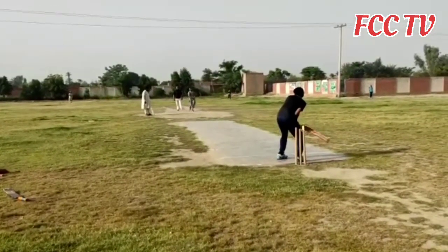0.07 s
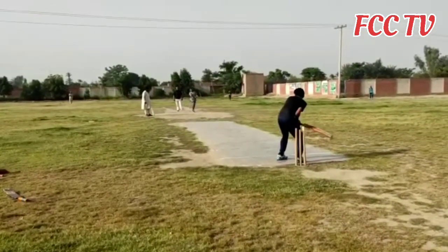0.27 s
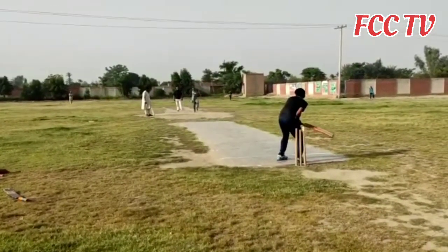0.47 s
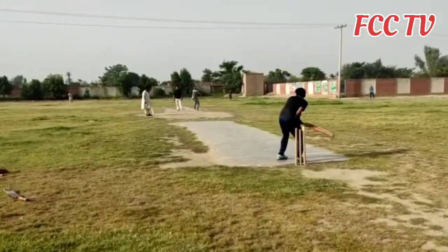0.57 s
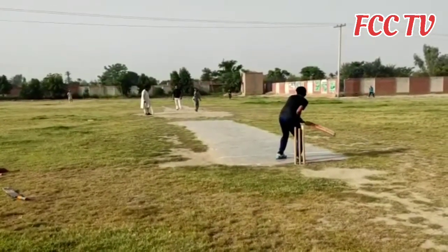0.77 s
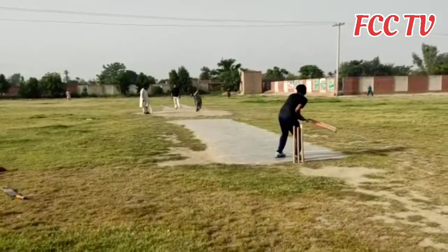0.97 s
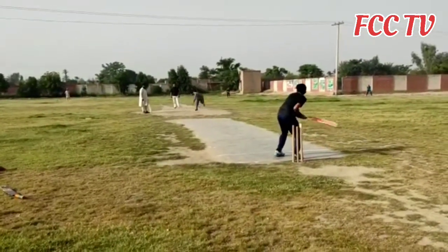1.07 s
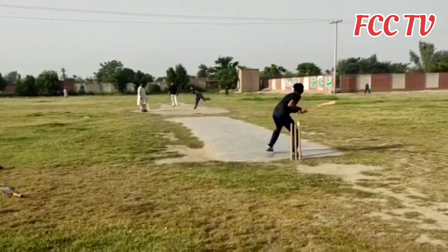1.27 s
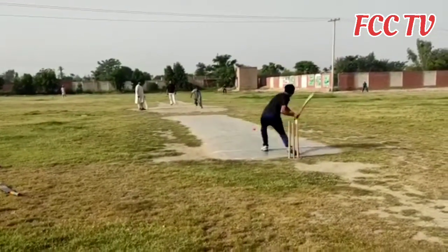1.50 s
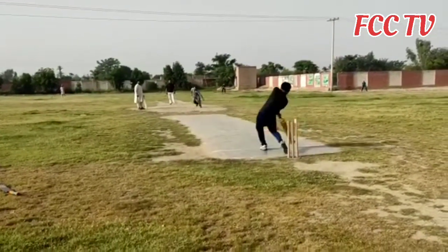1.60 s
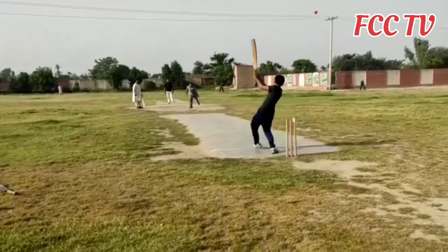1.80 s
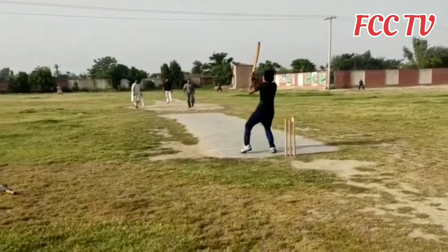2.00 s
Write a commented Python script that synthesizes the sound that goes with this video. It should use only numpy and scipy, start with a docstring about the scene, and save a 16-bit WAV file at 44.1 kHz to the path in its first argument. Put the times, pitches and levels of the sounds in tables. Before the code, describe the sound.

A hard, bright wooden crack of a cricket bat on a ball at 1.72 seconds dominates, slightly clipped. Before it, faint birds chirp until about 1.5 over outdoor hush, light wind and rustle; soft gritty footfalls come near 0.1, 1.0 and 1.54, the ball bounces at 1.63, and the bat faintly swishes. A woody wall echo answers from the left at 1.88, then a step and scrape around 1.94 and a tiny hiss.

```python
"""A bat cracks against a ball on an open cricket ground, after footfalls, a bounce and a swish. A wall far to
the left returns a woody clack 160 ms later; one grainy shoe scrape follows, and a brief grainy swell of noise
closes the scene. Small birds chirp in the distance over a hush, light wind and a soft rustle. Impacts are
coloured noise bursts with decaying sines; birds are gliding sines; the air is steady coloured noise with slowly
wandering levels."""
import sys
import numpy as np
from scipy import signal
from scipy.fft import rfft, irfft
from scipy.io import wavfile
from scipy.ndimage import uniform_filter1d

SR = 44100
rng = np.random.default_rng(int(sys.argv[2]) if len(sys.argv) > 2 else 0)


def inscribe(sig):
    """Save sig as 16-bit PCM at rate SR to the path in sys.argv[1].

    A 1-D sig is mono; a 2-D sig holds one channel per row.
    Samples are clipped to [-1, 1] before scaling.
    """
    pcm = np.round(np.clip(np.atleast_2d(sig).T, -1, 1) * 32767)
    wavfile.write(sys.argv[1], SR, pcm.astype(np.int16))


N = 90404
T = np.arange(N) / SR  # time axis, s
HIT_S = 1.7239  # contact of bat and ball
# spectrum of the crack, shared by bat and wall: freq_hz, level_db
CRACK_SPECTRUM = [(60, -35), (200, -15.5), (390, -24.5), (800, -5), (1180, -14.5), (1550, -4),
                  (2100, -16.5), (2700, -12), (3650, -4), (4900, -15), (5800, -10), (7500, -9),
                  (9500, -22.5), (13600, -34.5), (16000, -44)]


def bat():
    """Impact excitation: a hard broadband crack, a bright snap, a reflection off the pitch, and modal ringing."""
    # dull reflection of the crack off the pitch: freq_hz, level_db
    pitch_spectrum = [(250, -1), (2500, -7), (5000, -14)]
    crack_db, crack_rise_s, crack_decay_s = 22, 0.0009826, 0.00094
    snap_hz, snap_db, snap_peak_s = 3664, -11.5, 0.00046
    pitch_delay_s, pitch_db = 0.0032, -7
    ring_delay_s, ring_rise_s, grip_s = 0.001599, 0.003, 0.009

    crack = amp(crack_db) * colour(burst(crack_rise_s, crack_decay_s), CRACK_SPECTRUM)
    t = T[:SR // 10]
    snap_shape = (t / snap_peak_s) ** 2 * np.exp(2 - 2 * t / snap_peak_s)
    snap = snap_shape * np.sin(2 * np.pi * snap_hz * t)
    add(crack, crack_rise_s, amp(snap_db) * snap)

    out = np.zeros((2, N))
    add(out, HIT_S, crack)
    add(out, HIT_S + pitch_delay_s, amp(pitch_db) * colour(crack, pitch_spectrum))
    add(out, HIT_S + ring_delay_s, ring(ring_rise_s, grip_s))
    return out


def ring(rise_s, grip_s):
    """Modal superposition: blade and ball modes ring with random phases until the grip damps them."""
    # modes of bat and ball, t60 before grip damping: freq_hz, level_db, t60_s, left_over_right_db
    bat_modes = [(229, -24, 0.039, 0), (683, -33, 0.028, 3), (1036, -24.5, 0.029, 2), (1525, -22, 0.02, -7),
                 (2040, -25, 0.03, 5), (2413, -21.5, 0.017, 8), (2552, -11.5, 0.023, 7.5),
                 (3126, -15, 0.024, 3), (3546, -14, 0.02, 7), (6000, -26, 0.012, 0), (6990, -21, 0.0071, 1),
                 (8250, -18, .008, 0)]
    right_lead_s = 0.00002
    t = T[:SR // 10]
    swell = np.minimum(t / rise_s, 1) * np.exp(-(t / grip_s) ** 2)
    ear_t = np.array([t, t + right_lead_s])
    modes = np.zeros((2, len(t)))
    for hz, db, t60, pan_db in bat_modes:
        decay = np.exp(-np.log(1000) * ear_t / t60)
        swing = np.sin(2 * np.pi * (hz * ear_t + rng.random()))
        modes += pan(pan_db) * amp(db) * decay * swing
    return swell * modes


def wall():
    """Delayed specular reflection: the far wall returns a blurred crack and a quick woody ring."""
    # reflectivity of the wall: freq_hz, level_db
    wall_spectrum = [(200, -10), (700, -12), (1000, 1), (1380, 8), (1650, 0), (2080, 12), (2600, 2),
                     (3600, -7.5), (12000, -8)]
    delay_s, pan_db, crack_db, ring_db = 0.1609, 9, 1, -20.5
    rise_s, crack_decay_s, grip_s = 0.00128, 0.002, 0.0075
    out = np.zeros((2, N))
    crack = colour(burst(2 * rise_s, crack_decay_s), CRACK_SPECTRUM)
    add(out, HIT_S + delay_s, amp(crack_db) * crack)
    add(out, HIT_S + delay_s, amp(ring_db) * ring(rise_s, grip_s))
    return pan(pan_db) * colour(out, wall_spectrum)


def bounce():
    """Elastic impact: the ball slaps the hard pitch and gives a hollow, damped thump as it springs back."""
    # gritty slap of ball on pitch: freq_hz, level_db
    slap_spectrum = [(200, -13), (650, -4.5), (1300, -8.5), (2400, -3.5), (3500, -7.5), (4500, 0.5),
                     (5300, -9.5), (7300, 0.5), (9500, -11.5), (15000, -21.5)]
    bounce_s, slap_db, slap_decay_s = 1.6333, -4.5, 0.00185
    out = np.zeros((2, N))
    add(out, bounce_s, amp(slap_db) * colour(burst(0.00038, slap_decay_s), slap_spectrum))
    add(out, bounce_s, -thump(db=-24, hz=287, t60=0.017))
    return out


def feet():
    """Compound impact: each footfall sums a damped thud, a knock of the sole and a crunch of grit."""
    # footfalls: start_s, thud_db, thud_hz, knock_db, grit_db, knock_decay_s
    footfalls = [(.080, -50, 200, -17.5, -18, 0.004), (.978, -41, 203, -20, -27, 0.0012),
                 (0.9946, -37, 304, -12, -24.5, 0.0018), (1.106, -54, 200, -20, -26, .008),
                 (1.534, -40, 200, -13, -13.5, 0.0031), (1.5427, -19, 271, 0, -15, 0.0023),
                 (1.555, -37, 260, -17, -26.5, 0.0052), (1.582, -39, 230, -16.5, -29, 0.0023),
                 (1.82, -47, 240, -16.5, -18.5, 0.0032), (1.9431, -31.5, 169, -3.5, -20, 0.0029)]
    # sole knock, then grit crunch: freq_hz, level_db
    knock_spectrum = [(80, -8.5), (330, -4), (550, -15.5), (720, -2.5), (950, 1.5), (1300, -12),
                      (2500, -42)]
    grit_spectrum = [(200, 3.5), (900, -6), (1700, 1), (4300, -2.5), (5500, -11.5), (7500, -11),
                     (14000, -32)]
    out = np.zeros((2, N))
    for s, thud_db, thud_hz, knock_db, grit_db, decay in footfalls:
        add(out, s, thump(thud_db, thud_hz, t60=0.016))
        add(out, s, amp(knock_db) * colour(burst(0.0011, decay), knock_spectrum))
        # the crunch of grit outlasts the knock
        add(out, s, amp(grit_db) * colour(burst(0.00052, 1.87 * decay), grit_spectrum))
    return out


def thump(db, hz, t60):
    """Damped oscillation: a low push of the ground that dies exponentially."""
    t = T[:SR // 10]
    onset = np.minimum(t * hz * 2, 1)  # rises over half a cycle
    decay = np.exp(-np.log(1000) * t / t60)
    return amp(db) * onset * decay * np.sin(2 * np.pi * hz * t)


def swish():
    """Aerodynamic noise: the moving bat makes a rush of air just before contact."""
    # rush of air: freq_hz, level_db
    swish_spectrum = [(60, -14), (220, 5.5), (500, -11.5), (1200, -11.5), (2500, -8.5), (5000, -14.5),
                      (8000, -22.5), (14000, -33)]
    # one swell of noise: centre_s, half_length_s, level_db
    swish_swell = (1.702, .024, -35)
    return sweep(*swish_swell, swish_spectrum)


def grainy_noises():
    """Roughly modulated noise: one grainy shoe scrape, then a brief grainy swell at the end."""
    # a shoe scrape, then a brief swell: centre_s, half_length_s, level_db
    grainy_swells = [(1.934, 0.033, -43), (2.042, 0.016, -48.5)]
    # shared spectrum of scrape and swell: freq_hz, level_db
    grainy_spectrum = [(300, -8.5), (1500, -25), (3100, 2.5), (4800, -7.5), (7000, -3.5), (9500, -24),
                       (14000, -38)]
    grain_db = 3
    swells = sum(sweep(*row, grainy_spectrum) for row in grainy_swells)
    return swells * amp(grain_db * drift(N, size=60))


def sweep(s, width, db, spectrum):
    """Amplitude modulation: coloured noise swells and fades under a Gaussian envelope."""
    return amp(db) * colour(noise(N), spectrum) * np.exp(-((T - s) / width) ** 2)


def ground(knocks, stroke):
    """Diffuse scattering: grass blurs every knock; the stroke raises faint echoes and a soft tail from the trees."""
    # faint echoes of the stroke: delay_s, level_db, left_over_right_db, smear_s
    echo_rows = [(.04, -34, 2, 0.007), (0.095, -37, -2, 0.0078), (.1265, -37, 0.5, .002),
                 (.151, -33, 7, .014), (0.2, -36, 8, .008)]
    # echoes and tail, then grass scatter: freq_hz, level_db
    echo_spectrum = [(700, 1), (1600, -3), (3000, 3), (3900, -5), (9000, -8)]
    scatter_spectrum = [(200, -4), (600, 15), (2000, 4), (5000, 5.5), (14000, 17)]
    scatter_db, scatter_decay_s = -29, 0.019
    tail_delay_s, tail_db, tail_rise_s, tail_decay_s = 0.15, -29, 0.02, 0.027

    echoes = np.zeros((2, N))
    for delay, db, pan_db, smear in echo_rows:
        add(echoes, delay, amp(db) * pan(pan_db) * burst(smear / 2, smear))
    add(echoes, tail_delay_s, amp(tail_db) * pan(db=3) * burst(tail_rise_s, tail_decay_s))
    grass = amp(scatter_db) * pan(db=7.5) * convolve(knocks, burst(0.0016, scatter_decay_s))
    return colour(convolve(stroke, echoes), echo_spectrum) + colour(grass, scatter_spectrum)


def birds():
    """Frequency modulation: distant tweets and chirps glide down, whistles stay level, and trees blur them all."""
    # thin high tweets, all ending on one pitch: start_s
    tweet_starts = [0.065, 0.152, 0.411, 0.497, 0.75, 0.835, 1.088]
    # steeply falling chirps: start_s, end_hz
    chirp_rows = [(.456, 3850), (0.534, 5290), (0.563, 3810), (0.684, 3770), (.79, 3820), (1.018, 3770),
                  (1.126, 3850), (1.347, 3770), (1.46, 3820)]
    # a second bird's level whistles: start_s, length_s, level_db
    whistle_rows = [(.305, 0.042, -65.5), (.57, 0.12, -64), (.94, 0.093, -66), (1.19, 0.058, -67),
                    (1.3, 0.053, -66.5)]
    wet_db, tail_s = -6.5, 0.047
    out = np.zeros((2, N))
    # fall is in Hz per second, waver a fraction of the pitch
    for s in tweet_starts:
        add(out, s, note(length=0.04, end_hz=6316, db=-64.5, fall=6170, waver=0.01))
    for s, end_hz in chirp_rows:
        add(out, s, note(length=0.029, end_hz=end_hz, db=-63.5, fall=27000, waver=0.024))
    for s, length, db in whistle_rows:
        add(out, s, pan(db=6.5) * note(length, end_hz=3380, db=db, fall=0, waver=0.027))
    blurred = convolve(out, burst(0.0046, tail_s))
    return pan(db=4.5) * (out + amp(wet_db) * blurred)


def note(length, end_hz, db, fall, waver):
    """Phase integration: a fluttering bird note follows a pitch that glides to end_hz and wavers."""
    flutter_db = 3.5
    t = T[:int(length * SR)]
    hz = (end_hz + fall * (length - t)) * (1 + waver * drift(len(t), size=50))
    level = amp(db + flutter_db * drift(len(t), size=120))
    swell = np.sin(np.pi * t / length)
    return level * swell * np.sin(2 * np.pi * np.cumsum(hz) / SR)


def air():
    """Stationary noise with slow modulation: an outdoor hush, wind on the microphone and a varying rustle."""
    # hush, wind and rustle: freq_hz, level_db
    hush_spectrum = [(20, -3.5), (45, -1), (200, -7), (550, -21.5), (1350, -26), (1900, -21), (2400, -26.5),
                     (3900, -24), (5900, -33), (7000, -31), (7900, -24), (9600, -41.5), (14000, -40.5)]
    wind_spectrum = [(15, -3), (45, -5), (100, -13.5), (250, -21), (1000, -45.5)]
    rustle_spectrum = [(200, 0.5), (600, -11.5), (1300, -6), (2300, 1), (3200, -9), (4200, -7.5),
                       (5500, -19.5), (8000, -15), (10000, -35), (14000, -41)]
    # course of the rustle: time_s, level_db
    rustle_course = [(0, -52.5), (.12, -54.5), (.36, -57), (.5, -67.5), (.8, -74.5), (1.25, -67.5),
                     (1.45, -63), (1.6, -61.5), (1.8, -61.5), (2.05, -60)]
    hush_db, hush_flicker_db = -58, 1.28
    wind_db, wind_gust_db, wind_pan_db = -64, 0.5, 2
    rustle_flicker_db, rustle_pan_db = 1.34, 5

    hush_gain = amp(hush_db + hush_flicker_db * drift(N, size=900))
    hush = hush_gain * unit(colour(noise(N), hush_spectrum))
    wind_gain = amp(wind_db + wind_gust_db * drift(N, size=4000)) * pan(wind_pan_db)
    wind = wind_gain * unit(colour(noise(N), wind_spectrum, size=8192))
    rustle_db = np.interp(T, *np.transpose(rustle_course)) + rustle_flicker_db * drift(N, size=400)
    rustle = amp(rustle_db) * pan(rustle_pan_db) * unit(colour(noise(N), rustle_spectrum))
    return hush + wind + rustle


def ports(pair):
    """Partial coherence: blends two unrelated signals into what the two microphone ports hear."""
    # left-right likeness: freq_hz, likeness (0 to 1)
    likeness = [(30, 0.66), (200, 0.91), (800, 0.87), (1500, 0.058), (2500, 0.071), (4200, 0.14),
                (7000, 0.85), (14000, 1)]
    # phase by which left leads: freq_hz, lead_rad
    phase_lead = [(30, -1.1), (250, -0.85), (900, -0.97), (2000, -0.92), (4000, 0.77), (8000, 0.11)]
    hz = np.fft.rfftfreq(pair.shape[1], 1 / SR)
    left, other = rfft(pair)
    same = np.clip(read(likeness, hz), -1, 1)
    blend = same * left + np.sqrt(1 - same ** 2) * other
    right = blend * np.exp(-1j * read(phase_lead, hz))
    return irfft(np.array([left, right]), pair.shape[1])


def burst(rise_s, decay_s, size=8192, count=3):
    """Impulsive excitation: a puff of noise with a fairly even spectrum and energy 1 on each side."""
    t = np.arange(size) / SR
    shape = np.minimum(t / rise_s, 1) * np.exp(-np.maximum(t - rise_s, 0) / decay_s)
    x = rng.standard_normal((2, size)) * shape
    # alternate between shaping in time and flattening the spectrum
    for _ in range(count):
        phase = np.angle(rfft(x * np.sqrt(shape)))
        x = irfft(np.exp(1j * phase))
    x = ports(x) * shape ** .5
    return x / np.linalg.norm(x, axis=1, keepdims=True)


def noise(size):
    """Random excitation: white noise, partly coherent between the two ports."""
    return ports(rng.standard_normal((2, size)))


def drift(length, size):
    """Low-pass smoothing: twice-averaged noise gives a slow random wander of rms 1."""
    x = uniform_filter1d(rng.standard_normal(length), size)
    return unit(uniform_filter1d(x, size))


def colour(x, points, size=2048):
    """Minimum-phase filtering: the Hilbert transform of the log gain yields a causal response."""
    log_gain = np.log(amp(read(points, abs(np.fft.fftfreq(size, 1 / SR)))))
    spectrum = np.exp(np.conj(signal.hilbert(log_gain)))
    return convolve(x, np.fft.ifft(spectrum).real[:size // 2])


def convolve(x, response):
    """Linear superposition: convolution, cut to at most the length of the scene."""
    return signal.fftconvolve(x, np.atleast_2d(response), axes=1)[:, :N]


def read(points, hz):
    """Logarithmic pitch scale: interpolates a table on a log-frequency axis."""
    f, value = np.transpose(points)
    return np.interp(np.log(hz + 1), np.log(f + 1), value)


def amp(db):
    """Decibel law: level to amplitude gain."""
    return 10 ** (np.asarray(db) / 20)


def unit(x):
    """Normalization of power: scales to rms 1."""
    return x / np.sqrt(np.mean(x ** 2) + 1e-20)


def pan(db):
    """Interaural level difference: gains that put left above right by db."""
    return amp(np.array([[db], [-db]]) / 2)


def add(mix, s, sound):
    """Superposition: mixes a sound in at time s."""
    part = mix[:, max(round(s * SR), 0):][:, :sound.shape[-1]]
    part += sound[..., :part.shape[1]]


def scene():
    """Superposition of sources: the stroke and its echoes over the sounds of the field."""
    stroke = bat()
    knocks = stroke + bounce() + feet()
    echoes = ground(knocks, stroke) + wall()
    return knocks + echoes + swish() + grainy_noises() + birds() + air()


def record(dry):
    """Saturation and band limiting: the peak of the crack clips, then a low-pass removes the top."""
    ceiling, edge_hz = 0.85, 14600
    low_pass = signal.firwin(255, edge_hz, window=("kaiser", 8), fs=SR)
    return signal.oaconvolve(np.clip(dry, -ceiling, ceiling), low_pass[None], "same")


dry = scene()
out = record(dry)
inscribe(out)
```